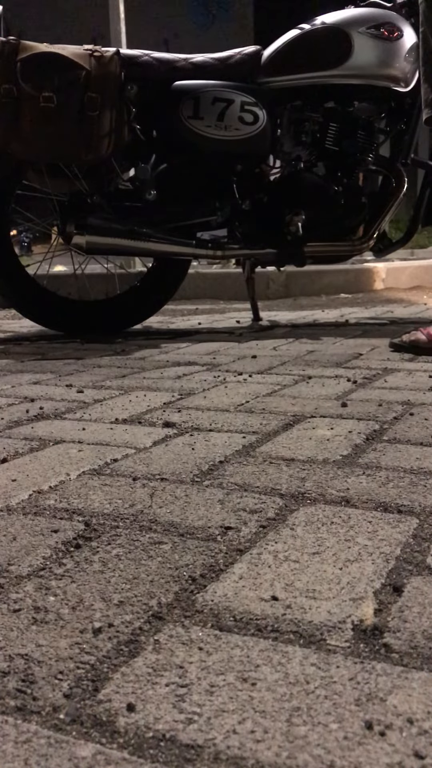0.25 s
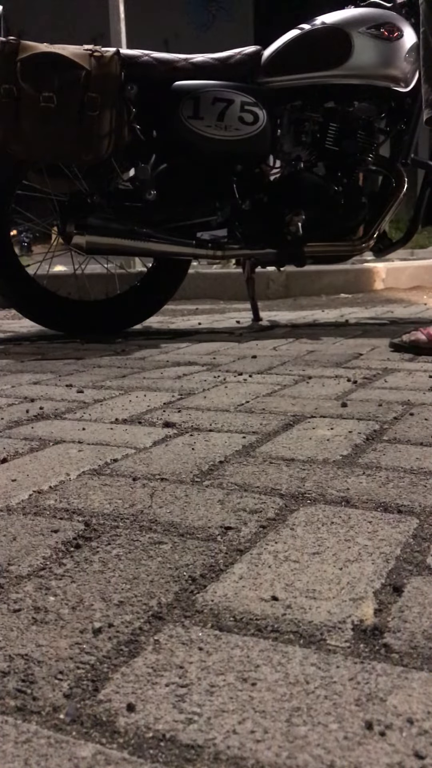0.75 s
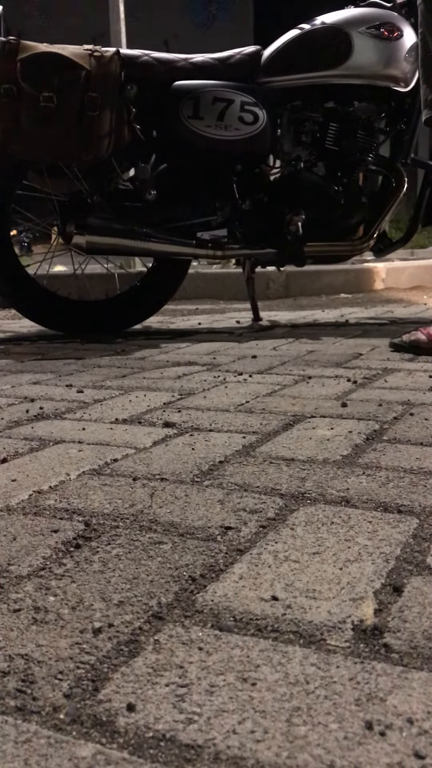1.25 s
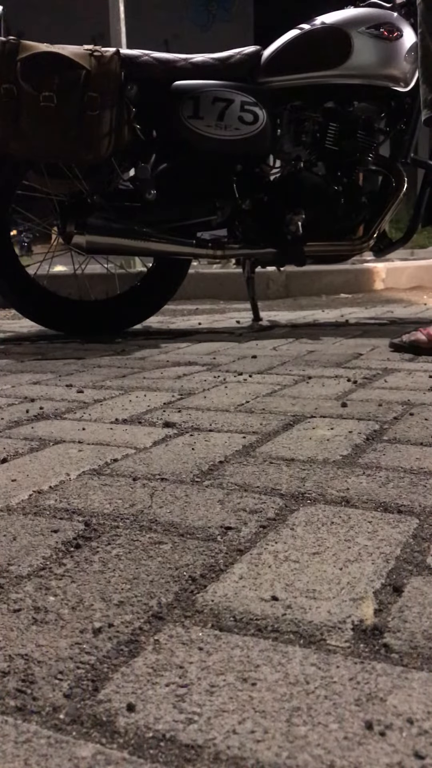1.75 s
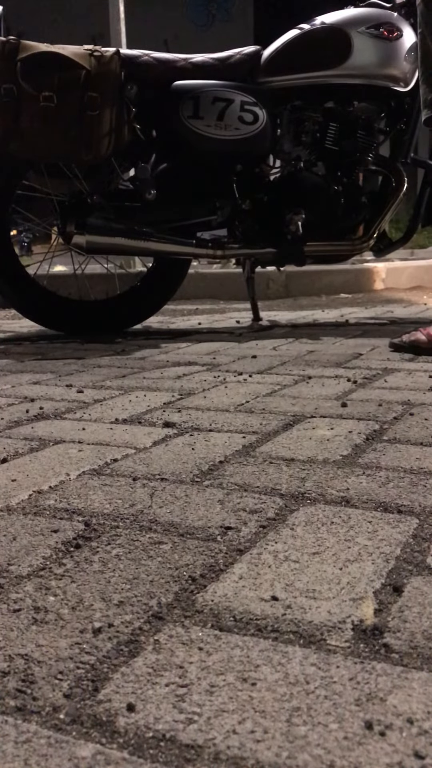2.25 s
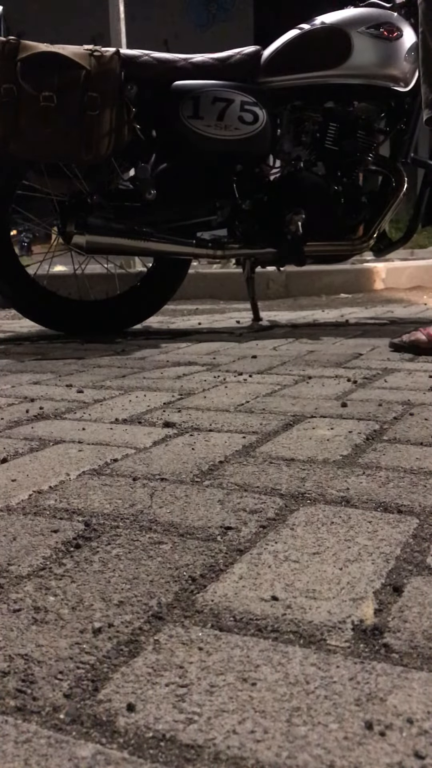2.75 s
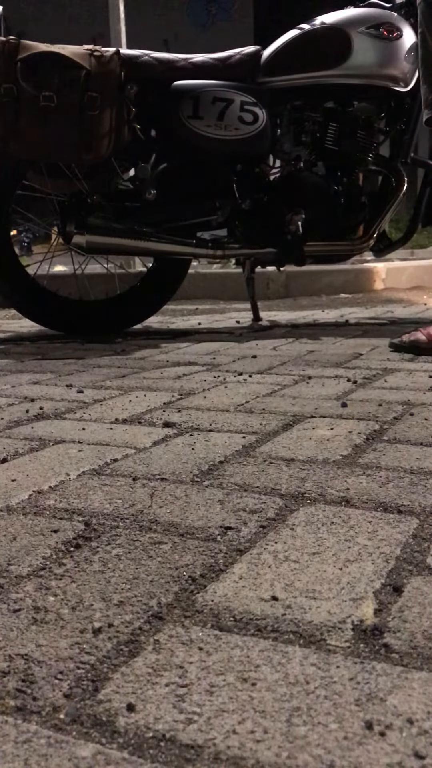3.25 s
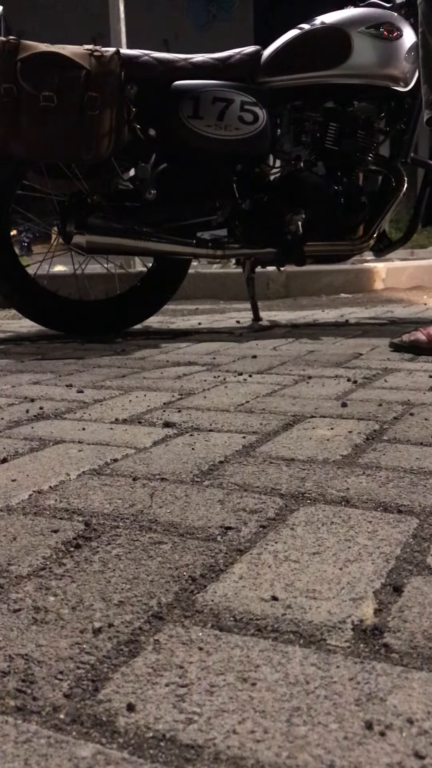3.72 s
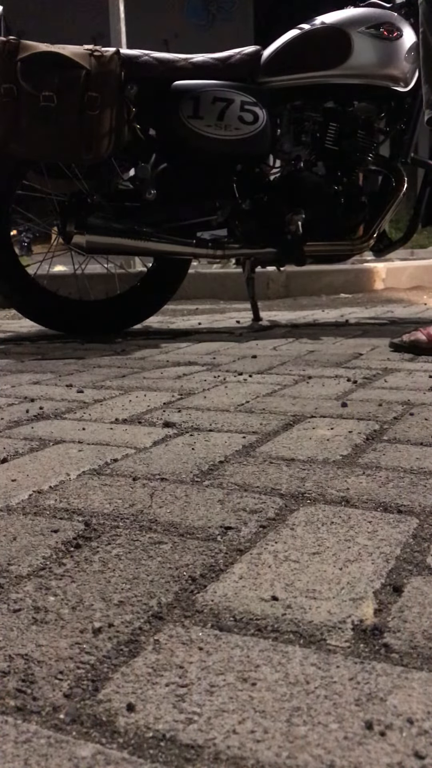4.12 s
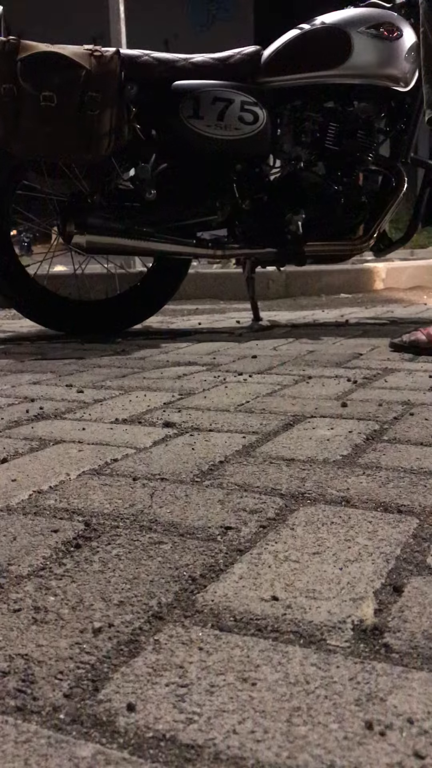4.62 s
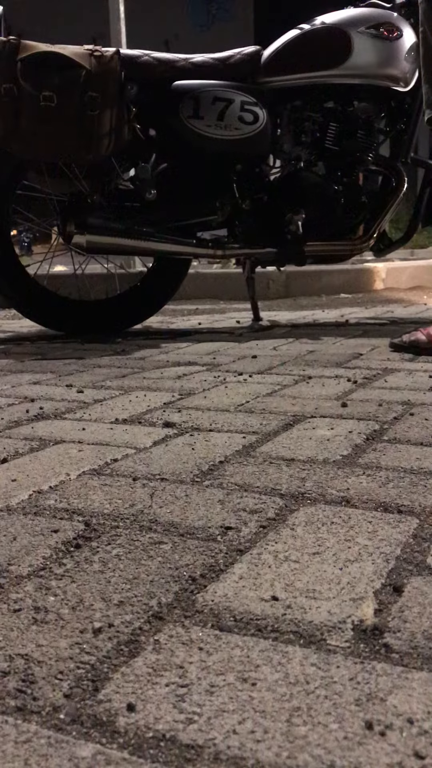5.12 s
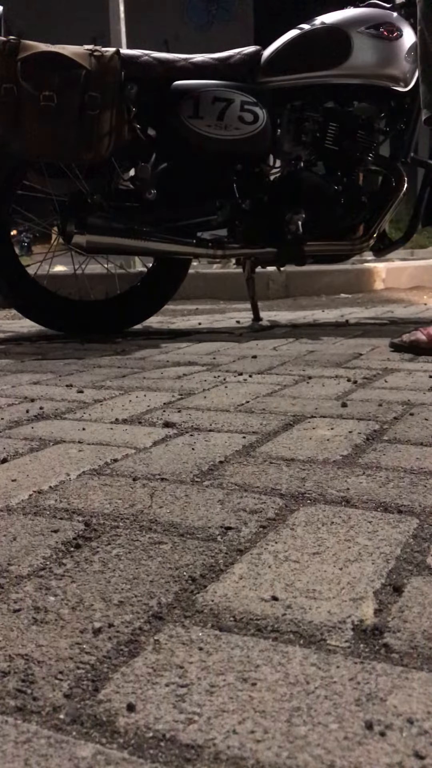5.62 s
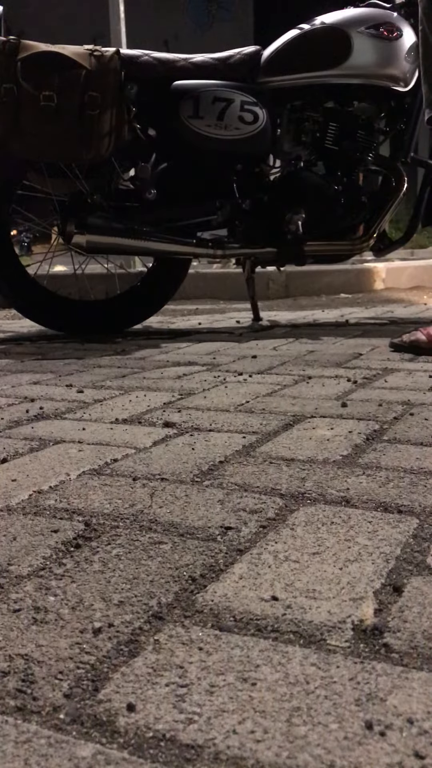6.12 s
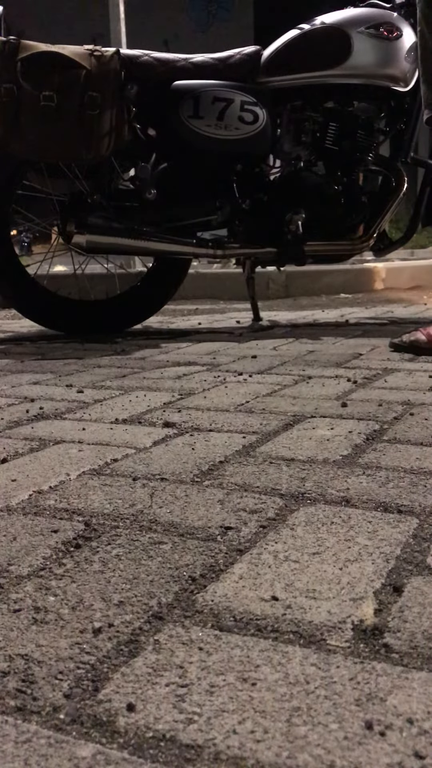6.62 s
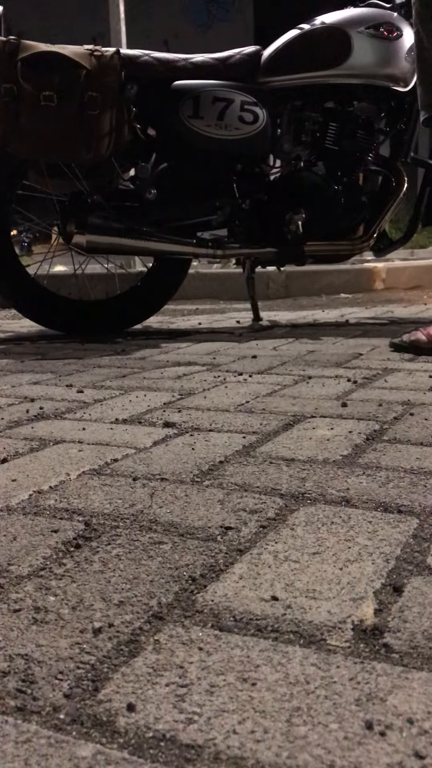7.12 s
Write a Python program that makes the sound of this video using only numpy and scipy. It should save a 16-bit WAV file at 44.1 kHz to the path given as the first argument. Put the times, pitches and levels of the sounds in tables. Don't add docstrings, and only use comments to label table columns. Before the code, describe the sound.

A throaty one-cylinder exhaust dominates, close and punchy, with distinct thumps at idle. Three throttle twists fuse the pulses into a rough, raspy growl, each followed by a stumbling fall. The last is the longest and strongest, then the beats spread apart into laboured thuds. Intake rush, chain and valve chatter stay low underneath; a nearby wall adds a barely audible echo, and the loudest pops sound squeezed.

```python
import sys
import numpy as np
from scipy import signal
from scipy.fft import rfft, irfft
from scipy.io import wavfile
from scipy.ndimage import uniform_filter1d, minimum_filter1d

SR = 44100
rng = np.random.default_rng(int(sys.argv[2]) if len(sys.argv) > 2 else 0)


def rack_gain(trim_db):
    fader = np.asarray(trim_db, float)
    return 10 ** (fader / 20)


def put_to_file(sound):
    columns = np.atleast_2d(sound).T
    safe = np.clip(columns, -1, 1)
    whole_steps = np.round(safe * 32767)
    wavfile.write(sys.argv[1], SR, whole_steps.astype(np.int16))


N = 325017
TIME_S = np.arange(N) / SR


def rms_one(x):
    return x / np.sqrt(np.mean(x ** 2) + 1e-20)


def coloured(spectrum):
    hz, db = np.transpose(spectrum)
    bins = np.arange(1, N // 2 + 2) * SR / N
    gain = rack_gain(np.interp(np.log(bins), np.log(hz), db))
    return rms_one(irfft(rfft(rng.standard_normal(N)) * gain, N))


def drift(rate_hz):
    low = signal.butter(2, rate_hz, fs=SR, output="sos")
    return rms_one(signal.sosfilt(low, rng.standard_normal(N + SR))[SR:])


def resonance(x, hz, width_hz):
    r = np.exp(-np.pi * width_hz / SR)
    poles = [1, -2 * r * np.cos(2 * np.pi * hz / SR), r * r]
    return signal.lfilter([(1 - r * r) / 2, 0, (r * r - 1) / 2], poles, x)


def add(out, start_s, hz, t60_s, gain):
    first = max(int(np.ceil(start_s * SR)), 0)
    age = np.arange(first, min(N, first + int(t60_s * SR))) / SR - start_s
    envelope = gain * rack_gain(-60 * age / t60_s) * (1 - np.exp(-9.0 * hz * age))
    out[first:first + len(age)] += envelope * np.sin(2 * np.pi * hz * age)


# (time [s], firing rate [1/s])
SPEED = [(0, 17.352), (.6555, 17.629), (1.0615, 16.628), (1.3095, 41.967), (1.5905, 34.211),
         (1.9935, 25.025), (2.5515, 18.098), (2.7875, 29.745), (3.3995, 18.793), (4.0575, 15.57),
         (4.3515, 17.098), (4.6245, 26.562), (4.8515, 31.493), (5.0575, 45.075), (5.8665, 22.747),
         (6.5335, 11.848), (6.8165, 9.158), (7.37, 10.397)]


def cycles():
    start_cycle = .6554
    return start_cycle + np.cumsum(np.interp(TIME_S, *np.transpose(SPEED))) / SR


# (time [s], level [dB])
CHARGE = [(.75, -3.5), (1.1, -0.5), (1.39, -1.5), (1.62, -2.5), (1.93, -17.5), (2.07, -11.5), (2.5, -6),
          (2.68, -1.5), (2.98, -14), (3.16, -7), (3.3, -3.5), (4.95, -.5), (5.11, -4.5), (5.15, 1),
          (5.68, -5), (5.9, -18), (6.1, -8), (6.85, 1.2)]
# (time [s], blowdown sharpness [dB])
BLOWDOWN = [(1.04, -11.5), (1.13, 3.5), (1.32, 0), (1.36, -6), (1.6, -11.5), (1.97, -17.5), (2.05, -9.5),
            (2.56, -9.5), (2.66, -2), (2.82, -2.5), (2.89, -12.5), (3.23, -7.5), (4.2, -10), (4.74, 1),
            (5.1, 1), (5.14, -3.5), (5.9, -19.5), (6.1, -10.5)]
# (time [s], volume change [dB], sharpness change [dB])
MISFIRES = [(1.3491, -5.5, -6), (1.529, -8, -8), (1.6143, -12, -1.5), (1.6483, 0, -1), (1.709, -5, -1.5),
            (1.8431, -3, -6.5), (1.9562, -4, -9), (2.204, -4.5, -6.5), (2.7988, -0.5, -1),
            (2.867, -1.5, -4), (2.905, 5.5, 0), (3.0152, -.5, -10), (3.1382, -5, -11.5), (3.1827, -6, -12),
            (3.2287, 1, 1), (3.276, -3, -3), (3.375, -43, -10), (3.4782, -4.5, -4.5), (5.1234, -2, -7),
            (5.4567, -11, -5), (5.5219, -7, -1.5), (5.5827, -7, -3), (5.7249, -6, 1.5), (6.0295, -4, -16),
            (6.1343, -10.5, -12), (6.2483, -6.5, -8), (6.3792, -4.5, -9.5), (6.5304, -14, -24),
            (6.7099, -17, -20), (6.9192, -5.5, -4.5)]


def firings():
    cycle = cycles()
    s = np.interp(np.arange(1, int(cycle[-1]) + 1), cycle, TIME_S)
    volume = np.interp(s, *np.transpose(CHARGE))
    sharpness = np.interp(s, *np.transpose(BLOWDOWN))
    rows = np.c_[s, volume, sharpness]
    burn_scatter_db = .7
    rows[:, 1:] += burn_scatter_db * rng.normal(0, 1, (len(s), 2))
    for at, volume_db, sharp_db in MISFIRES:
        nearest = np.argmin(abs(s - at))
        rows[nearest] += at - s[nearest], volume_db, sharp_db
    return rows


# (opens [s], starts to shut [s], first opening [0-1], last opening [0-1])
TWISTS = [
    (1.07, 1.27, .95, .75),
    (2.51, 2.81, .5, .4),
    (4.27, 4.6, .35, .4),
    (4.82, 5.08, .3, .8),
]
IDLE_RATE, REV_SPAN = 17.5, 25
IDLE_CHARGE_DB, IDLE_BLOWDOWN_DB = -4, -10
TWIST_RISE_S, TWIST_FALL_S = .09, .09


def by_law(law, s):
    revs = (np.interp(s, *np.transpose(SPEED)) - IDLE_RATE) / REV_SPAN
    charge = (np.interp(s, *np.transpose(CHARGE)) - IDLE_CHARGE_DB) / 10
    blowdown = (np.interp(s, *np.transpose(BLOWDOWN)) - IDLE_BLOWDOWN_DB) / 10
    overrun = revs * (charge - blowdown)
    throttle = 0
    for opens, shuts, first, last in TWISTS:
        corners = [opens, opens + TWIST_RISE_S, shuts, shuts + TWIST_FALL_S]
        throttle = throttle + np.interp(s, corners, [0, first, last, 0], left=0, right=0)
    return np.dot(law, [1 + 0 * revs, revs, charge, blowdown, overrun, throttle])


# (frequency [Hz], t60 [s])
BOOM = (92.2, 0.21)
BARK = (205.2, 0.073)
# (frequency [Hz], level [dB], t60 [s], lead [ms], sign)
UPPER = [(287, 1, .044, 1.3, -1), (378, -4, .064, 1.5, 1), (478, -8, .048, 1.0, 1),
         (575, -19, .045, 1.3, 1)]
# (frequency [Hz], level [dB], t60 [s])
SHOCK = [(900, -15, .009), (1600, -25, .007)]
# (time [s], bark level [dB], upper mode level [dB])
AFTERPOPS = [
    (6.555, -19, -26),
    (6.739, -22.5, -26.5),
]
BOOM_SHARE_DB = (-4, -5, -5, -1.7, -3, 4.5)
FRONT_SHARE_DB = (-4, 9.5, 7.5, -0.5, 26.5, 13)
STEEP_DB = (-14, 10.5, -1, -3.5, -2, 25.5)
RETURN_DB = (-7.5, -5, 2, -4, -13, -1.5)
HEAT = (0.94, -0.033, -0.108, 0.13, -0.067, 0.03)
RING = (0.96, -0.51, 0.15, -0.25, -0.32, -0.33)
BOOM_LAG_MS = (4, 2.5, 4, -6, -1.5, 1)
BARK_LAG_MS = (0.67, 0.96, 0.37, -0.52, 0.45, 0.58)
FRONT_HZ = (479, -79, 59, 80, -200, 42)
RETURN_S, RETURN_HZ, RETURN_T60_S = 0.007184, 484.5, 0.021
MODE_SCATTER_DB, MODE_SCATTER = 1.3, .02


def exhaust(fired):
    out = np.zeros(N)
    add(out, -.0338, BOOM[0], BOOM[1], -rack_gain(-8))
    pops = list(fired) + list(AFTERPOPS)
    for (s, bark_db, upper_db), chance in zip(pops, rng.normal(0, 1, (len(pops), 6))):
        heat = by_law(HEAT, s)
        ring = max(by_law(RING, s), .2)
        front_hz = by_law(FRONT_HZ, s)
        slow = np.interp(s, [6.3, 6.6], [1, .7])

        boom_s = s + (by_law(BOOM_LAG_MS, s) + 0.067) / 1000
        boom_db = bark_db + by_law(BOOM_SHARE_DB, s)
        add(out, boom_s, BOOM[0] * heat ** 0.35, BOOM[1] * ring ** 0.73, -rack_gain(boom_db))
        bark_s = s + (by_law(BARK_LAG_MS, s) + 0.11) / 1000
        add(out, bark_s, BARK[0] * heat, BARK[1] * ring, rack_gain(bark_db))

        front_db = upper_db + by_law(FRONT_SHARE_DB, s)
        add(out, s - 0.26 / front_hz / slow, front_hz * slow, 3.65 / front_hz / slow, -rack_gain(front_db - 7.5))
        return_gain = slow ** 3.0 * rack_gain(upper_db + by_law(RETURN_DB, s))
        add(out, s + RETURN_S / heat, RETURN_HZ * heat, RETURN_T60_S * ring, return_gain)

        for (hz, db, t60_s, lead_ms, sign), c in zip(UPPER, chance):
            start_s = s - lead_ms / 1000 / slow ** 0.45
            mode_db = upper_db + db / slow ** 1.3 + MODE_SCATTER_DB * c
            add(out, start_s, hz * heat * (1 + MODE_SCATTER * c), t60_s * ring, sign * rack_gain(mode_db))
        steep_db = by_law(STEEP_DB, s)
        for (hz, db, t60_s), c in zip(SHOCK, chance[4:]):
            add(out, s - .75 / hz, hz * (1 + .02 * c), t60_s, rack_gain(upper_db + steep_db + db + 1.2 * c))
    return signal.sosfilt(signal.butter(4, 1800, fs=SR, output="sos"), out)


# (frequency [Hz], level [dB per Hz])
SPIT = [(600, 18), (1500, -1.5), (2200, -3), (4200, 1), (6000, 1), (9500, -2.5), (13000, 1), (15800, 0)]
SPIT_SHARE_DB = (-22, -7.5, 7, -11.5, -9, 9)


def spit(fired):
    s, _, sharp_db = np.transpose(fired)
    db = 1.594 * sharp_db + by_law(SPIT_SHARE_DB, s)
    gains = rack_gain(db + 7.5 + rng.normal(0, 1.8, len(s)))
    burst = np.zeros(N)
    for at, gain, period in zip(s - .0018, gains, np.gradient(s)):
        first = max(int((at - .03) * SR), 0)
        age = np.arange(first, min(N, first + SR // 8)) / SR - at
        hiss = 0.27 * np.exp(np.minimum(age, 0) / (0.38 * period ** 2))
        fade = rack_gain(-60 * age / 0.027) + rack_gain(-10 - 60 * age / 0.028)
        burst[first:first + len(age)] += gain * np.where(age < 0, hiss, fade)
    return uniform_filter1d(burst, size=20) * coloured(SPIT)


def wall_echo(pipe):
    late = np.r_[np.zeros(int(.017 * SR)), pipe][:N]
    return rack_gain(-30.0) * signal.lfilter([.2], [1, -.8], late)


# (frequency [Hz], level [dB per Hz])
RUSH = [(300, -10.5), (450, -10.5), (725, -25), (935, -19.5), (1100, -25.5), (1620, -22), (1970, -34),
        (2580, -26.5), (2860, -35), (4610, -31.5), (5850, -36.5), (8890, -37), (13000, -46), (15900, -49)]


def intake_rush(cycle):
    breathing = rack_gain(2.0 * np.cos(2 * np.pi * (cycle - .9)) + 2.0 * drift(40))
    return rack_gain(7.5) * breathing * coloured(RUSH)


# (share of the cycle [1], length as share [1], frequency [Hz], width [Hz], level [dB])
STROKES = [(.77, .09, 1150, 900, 0), (.885, .022, 1550, 500, 7), (.70, .025, 4400, 900, 1)]


def strokes(cycle):
    out = 0
    for share, length, hz, width_hz, db in STROKES:
        luck = rng.normal(0, 2.5, int(cycle[-1]) + 1)[cycle.astype(int)]
        swell = np.exp(-((cycle % 1 - share) / length) ** 2)
        out = out + rack_gain(db + luck) * swell * rms_one(resonance(rng.standard_normal(N), hz, width_hz))
    return out


# (share of the cycle [1], level [dB])
VALVES = [(.08, 1.5), (0.361, -5), (.55, -4), (.86, -15)]
# (frequency [Hz], width [Hz], level [dB])
CASES = [(893, 270, 10), (1427, 63, 4.5), (2527, 146, 2), (3190, 200, 0), (4087, 55, -0.5),
         (4650, 140, -0.5), (6830, 130, -2), (7420, 70, -3), (8876, 63, 0), (11900, 400, -13),
         (13100, 500, -7.5)]


def clatter(cycle):
    chain = rng.random(N) < 2500 / SR
    contacts = rack_gain(-17.0) * chain * rack_gain(2.95 * np.minimum(rng.exponential(1, N), 4))
    for share, db in VALVES:
        angle = (cycle - share) % 1
        luck = rng.normal(0, 3.2, int(cycle[-1]) + 2)[np.floor(cycle - share).astype(int)]
        contacts = contacts + rack_gain(db + luck - 17.0) * np.exp(-angle / 0.15)
    out = 0
    for hz, width_hz, db in CASES:
        scuff = contacts * rng.normal(0, 1, N)
        out = out + rack_gain(db) * rms_one(resonance(scuff, hz, width_hz))
    return rack_gain(1.5) * rms_one(out)


# (multiple of firing rate [1], level [dB])
GEARS = [(48.2, -44), (38.5, -51), (58.5, -54)]
MESH_DB = (0, 0, 0, -6, 0, -12)


def gears(cycle):
    rate = uniform_filter1d(uniform_filter1d(np.gradient(cycle), size=2500), size=2500)
    tones = 0
    for teeth, db in GEARS:
        tones = tones + rack_gain(db + 1.1 * drift(37.5)) * np.sin(2 * np.pi * teeth * np.cumsum(rate))
    tones = signal.sosfilt(signal.butter(8, 1880, fs=SR, output="sos"), tones)
    cover_hz, cover_width_hz = 1710, 290
    covered = resonance(resonance(tones, cover_hz, cover_width_hz), cover_hz, cover_width_hz)
    return rack_gain(by_law(MESH_DB, TIME_S)) * covered


# (time [s], level [dB])
PINGS = [
    (4.068, -35),
    (4.317, -25),
    (4.518, -24.5),
    (4.961, -29),
]


def accents():
    out = np.zeros(N)
    for s, db in PINGS:
        add(out, s, 4200, 0.019, rack_gain(db))
    return out


RUSH_DB = (-47, -1.85, 0.4, 4.5, -1, -0.5)


def scene():
    cycle = cycles()
    fired = firings()
    pipe = exhaust(fired) + spit(fired)
    running = intake_rush(cycle) + strokes(cycle) + clatter(cycle)
    engine = rack_gain(by_law(RUSH_DB, TIME_S)) * running + gears(cycle) + accents()
    return (pipe + wall_echo(pipe) + engine)[None]


def low_pass(x):
    return signal.sosfilt(signal.butter(12, 16500, fs=SR, output="sos"), x)


def record(dry):
    x = signal.sosfilt(signal.butter(2, 55, "high", fs=SR, output="sos"), dry)
    x = signal.sosfilt(signal.butter(2, 28, "high", fs=SR, output="sos"), x)
    x = signal.sosfilt(signal.cheby2(12, 60, 16500, fs=SR, output="sos"), x)
    room_left = minimum_filter1d(.99 / np.maximum(np.abs(x), .99), size=161)
    mix = x * uniform_filter1d(room_left, size=161)
    return low_pass(mix)


dry = scene()
out = record(dry)
put_to_file(out)
```